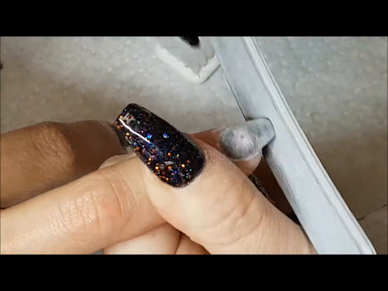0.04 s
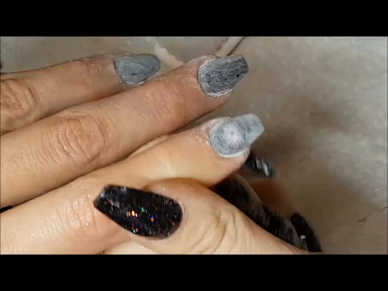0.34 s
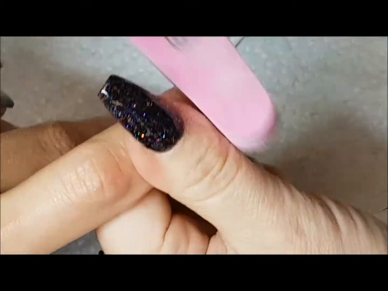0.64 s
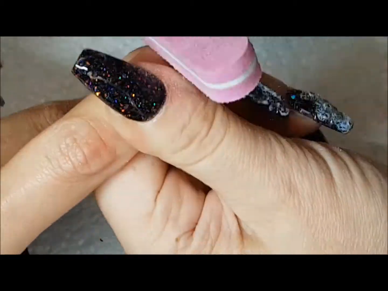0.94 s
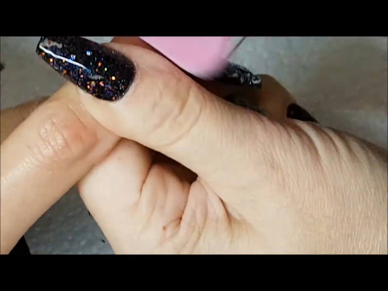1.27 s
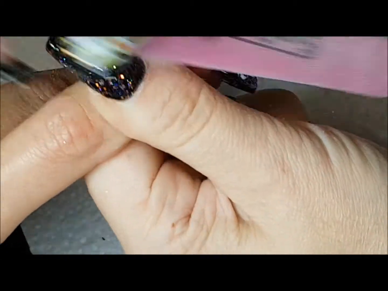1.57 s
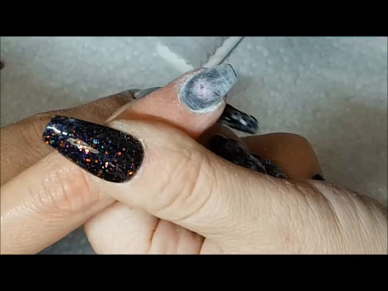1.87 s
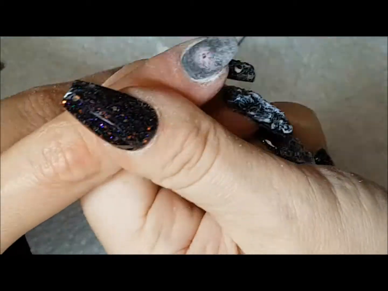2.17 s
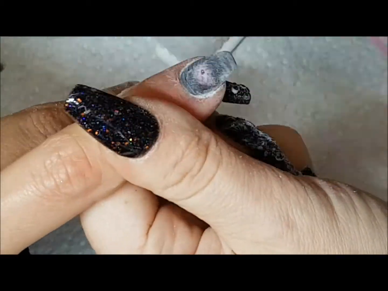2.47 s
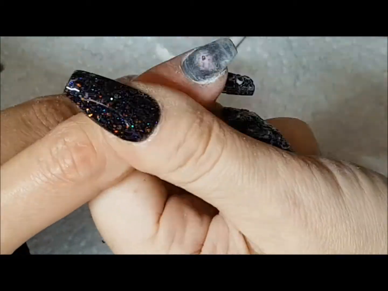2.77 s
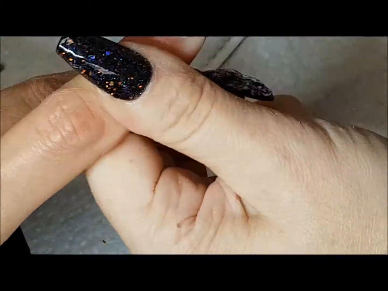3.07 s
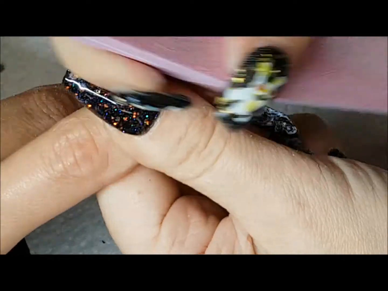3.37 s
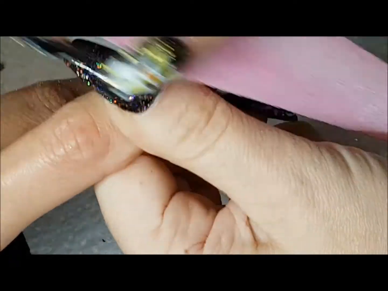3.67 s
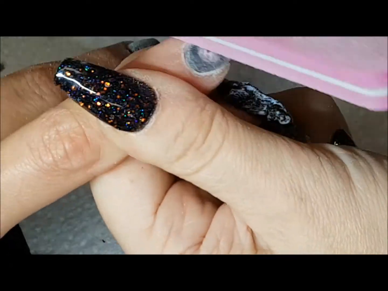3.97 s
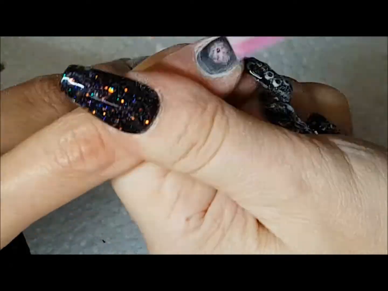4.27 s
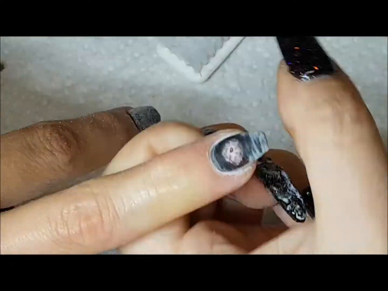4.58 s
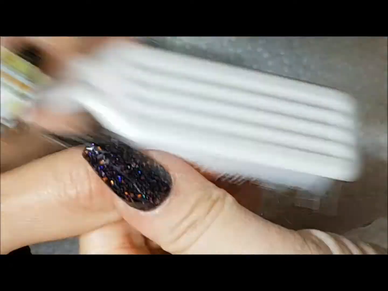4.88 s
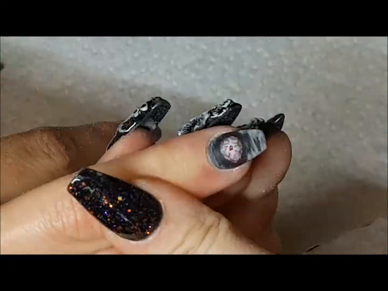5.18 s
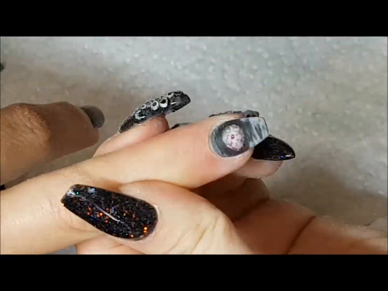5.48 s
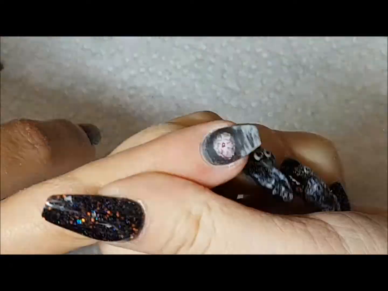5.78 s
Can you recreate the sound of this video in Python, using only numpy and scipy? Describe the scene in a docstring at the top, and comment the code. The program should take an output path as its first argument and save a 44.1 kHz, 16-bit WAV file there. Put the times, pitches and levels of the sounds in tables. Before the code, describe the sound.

In a small, faintly humming room, a foam block scrubs a gel nail with a fast, dry hiss, eases into separate light wipes, then skims it in another quick burst. Hard nails click together now and then. A tool knocks sharply on the table to the right, a brush briefly whisks off the dust, and a hand bumps and grazes the right side of the close microphone twice.

```python
"""A small, quietly humming room; a manicure a hand's length from a phone's two microphone ports.
A foam buffing block scrubs a gel nail in quick bursts and slower wipes, then a brush whisks the dust
off: both are friction, a hiss of tiny contacts that swells with each stroke. Hard nails click, a tool
is put down on the table to the right, and near the end a hand bumps and grazes the right port."""
import sys
import numpy as np
from scipy import signal
from scipy.fft import rfft, irfft, next_fast_len
from scipy.io import wavfile
from scipy.ndimage import uniform_filter1d, minimum_filter1d, map_coordinates

SR = 44100
rng = np.random.default_rng(int(sys.argv[2]) if len(sys.argv) > 2 else 0)


def wav_record(signal):
    """Record a signal, one row per channel, as 16-bit PCM in the file named by sys.argv[1]."""
    frames = np.transpose(np.atleast_2d(signal))
    bounded = np.clip(frames, -1, 1)
    # unit amplitude maps onto the largest positive 16-bit level
    quanta = np.round(bounded * 32767).astype(np.int16)
    wavfile.write(sys.argv[1], SR, quanta)


N = 261323

# hiss of the block pressed hard on the nail: f/Hz, density/dB
HARD_HISS = [(60, -23), (150, -15), (1500, -19), (2900, -11.5), (6000, -15.5), (8700, -8), (10900, -14),
             (12300, -4.5), (14200, -1.5), (15700, -8)]
# hiss of light rubbing: f/Hz, density/dB
LIGHT_HISS = [(100, -23), (2500, -4), (5900, -7.5), (9000, -1.5), (10500, -5.5), (12800, 2.5), (15700, -1)]
# likeness of close reflections at the two ports: f/Hz, correlation
ECHO_LIKENESS = [(1150, 0.99), (2300, 0.35), (6000, .05)]


def amp(db):
    """Decibels to gain."""
    return 10 ** (np.asarray(db) / 20)


def unit(x):
    """Scale to rms 1."""
    return x / np.sqrt(np.mean(x ** 2) + 1e-20)


def along(points, hz):
    """Read (f/Hz, value) points on a log axis."""
    f, v = np.transpose(points)
    return np.interp(np.log(hz + 1), np.log(f + 1), v)


def curve(rows):
    """Join (t/s, value) rows, one value per sample."""
    return np.interp(np.arange(N) / SR, *np.transpose(rows))


def wobble(rate):
    """A smooth random curve, rate knots a second."""
    return map_coordinates(rng.standard_normal(int(N * rate / SR) + 4), [np.arange(N) * rate / SR])


def filtered(x, response):
    """Filter x by a complex response of frequency."""
    n = x.shape[-1]
    size = next_fast_len(n + 8192)
    return irfft(rfft(x, size) * response(np.fft.rfftfreq(size, 1 / SR)), size)[..., :n]


def impulse(spectrum, size=4096):
    """The causal pulse that has this spectrum, with energy 1."""
    cepstrum = irfft(np.log(amp(along(spectrum, np.fft.rfftfreq(size, 1 / SR)))))
    cepstrum[1:size // 2] *= 2
    cepstrum[size // 2 + 1:] = 0
    pulse = irfft(np.exp(rfft(cepstrum)))
    return pulse / np.linalg.norm(pulse)


def add(track, s, sound):
    """Mix a sound into the track at time s."""
    part = track[:, round(s * SR):][:, :sound.shape[-1]]
    part += sound[..., :part.shape[-1]]


def spread(pair, spectrum, likeness=None):
    """Colour two unrelated signals; the spaced ports hear them alike in the bass, apart in the treble."""
    # likeness at the two ports: f/Hz, correlation
    usual_likeness = [(700, 0.98), (1400, 0.43), (3100, 0.1), (9000, 0.026)]

    def mid_side(hz):
        angle = np.arccos(np.clip(along(likeness or usual_likeness, hz), -1, 1)) / 2
        return amp(along(spectrum, hz)) * [np.cos(angle), np.sin(angle)]
    mid, side = filtered(pair, mid_side)
    return unit(np.array([mid + side, mid - side]))


def noise(n, spectrum, likeness=None):
    """n samples of coloured noise at the two ports."""
    return spread(rng.standard_normal((2, n)), spectrum, likeness)


def room(air_db=-66):
    """Room tone: a low hollow hum, which drops near the end, under a faint steady hiss."""
    # course of the hum: t/s, level/dB
    hum_level = [(0, -66), (.7, -61.5), (5.15, -63.5), (5.3, -70)]
    # colour of the hum: f/Hz, density/dB
    hum_colour = [(20, 2.5), (45, -26), (80, -17), (130, -12.5), (230, -4), (360, -25), (480, -0.5),
                  (580, -12), (730, 3.5), (930, -6.5), (1150, -9), (1450, -16), (5000, -35)]
    # colour of the hiss: f/Hz, density/dB
    air_colour = [(100, -19.5), (800, -19), (2050, 5), (2400, -4.5), (9000, -9.5), (15700, -11)]
    hum = amp(curve(hum_level) + 1.8 * wobble(7.554)) * noise(N, hum_colour)
    return hum + amp(air_db) * noise(N, air_colour)


def hand_on_port(bump_cycles=0.74, rough_db=3, slips_per_s=260, slip_db=6, left_db=-35):
    """Handling noise: skin bumps the right port and drags over it in a crunch of tiny slips."""
    # soft bumps of skin: t/s, level/dB, f/Hz
    bumps = [(5.154, -27, 300), (5.186, -22, 310), (5.192, -24, 500), (5.2185, -20, 500), (5.648, -26, 397),
             (5.664, -17, 380), (5.677, -20, 650), (5.6945, -11.5, 335), (5.699, -17, 800),
             (5.7084, -12, 550)]
    # skin sliding over the port: t/s, level/dB
    graze = [(5.13, -60), (5.172, -45), (5.19, -37), (5.226, -41), (5.24, -72), (5.605, -74), (5.645, -36),
             (5.705, -24.5), (5.728, -32), (5.76, -73)]
    # dull colour of the drag: f/Hz, density/dB
    skin_colour = [(40, -34), (90, -18), (160, 0.5), (300, 2), (560, 4), (1000, -3), (1800, -12.5),
                   (3000, -25), (9000, -53)]
    out, t = np.zeros((1, N)), np.arange(SR // 20) / SR - 1 / 40
    for s, db, hz in bumps:
        bump = np.exp(-(t * hz / bump_cycles) ** 2) * np.cos(2 * np.pi * (hz * t + rng.random()))
        add(out, s + t[0], amp(db) * bump)
    slip_rate = slips_per_s * np.exp(.5 * wobble(slips_per_s))
    slips = np.diff(np.floor(np.cumsum(slip_rate) / SR), prepend=0)
    slips *= rng.choice([-1, 1], N) * amp(rough_db * rng.standard_normal(N))
    crunch = amp(slip_db) * unit(slips) + rng.standard_normal(N)
    drag = unit(signal.fftconvolve(crunch, impulse(skin_colour))[:N])
    return amp([[left_db], [0]]) * (out + amp(curve(graze)) * drag)


def knocks(rows, spectrum, ring_db, near_db, near_t60, far_db, far_t60, low_cut_hz, treble_db,
           left_lag_ms=0, left_shade_db=0, thin_hz_per_db=0):
    """Each knock is a sharp crack, a short plastic ring and a scatter off the hands and the table."""
    # modes of the hard plastic: f/Hz, level/dB, t60/s
    modes = [(529, -9.5, 0.061), (690, -4.5, 0.029), (960, 1, 0.026), (1106, 5.5, 0.017),
             (1420, -9.5, 0.036), (1950, -10, 0.055), (2500, -14, 0.055)]
    out, crack = np.zeros((2, N)), impulse(spectrum)
    t = np.arange(len(crack)) / SR
    loudest_db = max(db for _, db, _ in rows)

    def to_ports(hz):
        shelf = along([(1100, 0.032), (1900, 0.98)], hz)
        treble = amp(shelf * np.array([[treble_db - left_shade_db], [treble_db]]))
        return treble * np.exp(1j * np.pi * hz * left_lag_ms / 1000 * np.array([[-1], [1]]))
    for s, db, bright_hz in rows:
        ring = sum(amp(level + rng.normal(0, 1.9) - 60 * t / t60)
                   * np.cos(2 * np.pi * hz * rng.normal(1, 0.013) * t) for hz, level, t60 in modes)
        echo_decay = amp(near_db - 60 * t / near_t60) + amp(far_db - 60 * t / far_t60)
        knock = crack + amp(ring_db) * ring + echo_decay * noise(len(t), spectrum, ECHO_LIKENESS)
        knock = np.pad(knock, ((0, 0), (32, 0)))  # room for the earlier port's arrival
        # soft contacts lose their treble, and the lighter the touch, the less bass it radiates
        thin_hz = low_cut_hz + thin_hz_per_db * (loudest_db - db)
        knock = signal.sosfilt(signal.butter(2, min(bright_hz, SR / 3), fs=SR, output="sos"), knock)
        knock = signal.sosfilt(signal.butter(2, thin_hz, "high", fs=SR, output="sos"), knock)
        knock = filtered(knock, to_ports)
        add(out, s - 32 / SR, amp(db) * 8 * knock / np.linalg.norm(knock))
    return out


def tool_put_down():
    """A tool knocks on the table off to the right; the left port hears it later and duller."""
    # the landing: t/s, relative level/dB, low-pass f/Hz
    landing = [(4.8025, -1, 8980)]
    # crack of tool on table: f/Hz, density/dB
    crack = [(250, -28), (400, -17.5), (510, -2.5), (620, -9), (880, -3), (1100, 3.5), (1290, -8.5),
             (1460, 2), (1950, -2.5), (4500, -5), (7400, -9.5), (9500, -26.5), (15700, -23)]
    return knocks(landing, crack, ring_db=-28.5, near_db=-18.5, near_t60=0.037, far_db=-22,
                  far_t60=0.067, low_cut_hz=404, treble_db=2.5, left_lag_ms=0.091, left_shade_db=1.5)


def nail_clicks():
    """Hard nails knock on each other and on the block."""
    # contacts: t/s, relative level/dB, low-pass f/Hz
    clicks = [(0.4066, -28.5, 3300), (0.4492, -15.5, 2900), (2.51, -34, 1300), (2.5206, -14, 1550),
              (2.528, -16.5, 1600), (4.557, -30.5, 1300), (4.573, -18, 3380), (4.5746, -20, 8100),
              (4.5982, -27, 1900), (4.6315, -32.5, 2000), (4.641, -35.5, 5500), (4.652, -34, 2000),
              (4.683, -42.5, 2200), (5.3055, -34.5, 4760)]
    # crack of a nail: f/Hz, density/dB
    crack = [(250, -11.5), (520, -1.5), (1080, 1.5), (1310, -6.5), (1500, -3), (4500, -4), (7400, -9.5),
             (9500, -7), (15700, -28)]
    return knocks(clicks, crack, ring_db=-26, near_db=-22, near_t60=0.0337, far_db=-28,
                  far_t60=0.079, low_cut_hz=378, treble_db=-3, thin_hz_per_db=14)


def light_ticks(scatter_db=-21, t60=0.024):
    """Each slight contact is one crisp pulse and a very short scatter."""
    # light ticks, and two faint short scrapes at the start: t/s, level/dB
    ticks = [(.041, -41), (.102, -40), (2.123, -30.5), (2.5953, -28.5), (2.649, -30.5), (2.696, -34),
             (3.174, -28.5), (3.217, -33.5), (3.247, -34), (3.29, -31), (4.495, -28.5)]
    # colour of a tick: f/Hz, density/dB
    tick_colour = [(200, -9), (1200, -2), (2300, 5), (4000, -4), (7000, -12), (15700, -11)]
    out, pulse = np.zeros((2, N)), impulse(tick_colour)
    t = np.arange(len(pulse)) / SR
    for s, db in ticks:
        scatter = amp(scatter_db - 60 * t / t60) * noise(len(t), tick_colour, ECHO_LIKENESS)
        add(out, s, amp(db) * (pulse + scatter))
    return out


def grit_snaps(t60=0.021):
    """Single grits catch on the nail's edge and let go with a thin tick."""
    # grits letting go: t/s, level/dB
    snaps = [(.4492, -45), (2.5206, -43), (4.33, -44), (4.568, -38.5), (4.648, -40), (5.5082, -43)]
    out, t = np.zeros((2, N)), np.arange(SR // 20) / SR
    for s, db in snaps:
        tick = noise(len(t), [(500, -30), (4000, -6), (9000, 11), (15000, 10)])
        add(out, s, amp(db - 60 * t / t60) * tick)
    return out


def friction(spectrum, grain_db, patchy_db=1.7, grits_per_s=30, grit_db=11):
    """Tiny contacts merge into a hiss whose colour shifts with the grip; coarse grits tick in it."""
    grits = (rng.random(N) < grits_per_s / SR) * amp(grit_db + rng.standard_normal(N))
    contacts = rng.standard_normal((2, N)) * amp(grain_db * wobble(1800))
    bands = signal.stft(contacts + grits, nperseg=256)[2]
    patches = uniform_filter1d(rng.standard_normal(bands.shape[1:]), size=7, axis=0)  # over frequency
    patches = uniform_filter1d(patches, size=18, axis=1)  # over time
    hiss = signal.istft(bands * amp(patchy_db * unit(patches)), nperseg=256)[1]
    return spread(hiss[:, :N], spectrum)


def sizzle(hiss, extra_db, edge_hz=12000):
    """The nail's edge digging into the block brings out the top of the hiss."""
    top = filtered(hiss, lambda hz: 1 / (1 + np.exp((edge_hz - hz) / 400)))
    return hiss + (amp(extra_db) - 1) * top


def scrub(tempo, pressure, spectrum, grain_db, turn_floor, sharpness, lean, uneven_db, fast_sizzle_db):
    """The tool breaks free after each turn and slows toward the next; level and sizzle follow speed."""
    done = curve(tempo)
    stroke = done.astype(int)
    moving = (done > 0) & (done < tempo[-1][1])
    speed = np.abs(np.sin(np.pi * (done - stroke) ** lean))
    swing = moving * (turn_floor + speed ** sharpness)
    s, level_db, sizzle_db = np.transpose(pressure)
    stroke_db = uneven_db * rng.standard_normal(stroke[-1] + 1)[stroke]
    force_db = curve(np.c_[s, level_db]) + stroke_db + wobble(300)
    loudness = amp(force_db) * swing / np.sqrt(np.mean(swing[moving] ** 2))
    top_db = curve(np.c_[s, sizzle_db]) + fast_sizzle_db * (speed - 1)
    return loudness * sizzle(friction(spectrum, grain_db), top_db)


def dust_brush():
    """Bristles whisk to and fro over the nail."""
    # the hand's pace: t/s, strokes done
    tempo = [(4.873, 0), (5.2, 16)]
    # how firmly the brush bears: t/s, level/dB, sizzle/dB
    pressure = [(4.87, -56, 0), (4.98, -49.5, 0), (5.15, -55.5, 0), (5.19, -48, 0)]
    # hiss of the bristles: f/Hz, density/dB
    bristle_hiss = [(70, -15), (250, -1), (1900, -3), (4200, -6), (8500, 1.5), (11200, -4.5), (15700, -3.5)]
    return scrub(tempo, pressure, bristle_hiss, grain_db=1, turn_floor=0.32, sharpness=1.4,
                 lean=0.9, uneven_db=0.5, fast_sizzle_db=0.3)


def swishes(sharpness=.9, uneven_db=1.5, fast_sizzle_db=3, overhang_s=.007, ring_db=4.5,
            ring_width_hz=900):
    """Foam or skin lands, slides with wavering pressure and eases off, sizzling most in mid-stroke."""
    # wipes of the block, and skin brushing near the end: t/s, length/s, level/dB, sizzle/dB
    strokes = [(0, 0.11, -56.5, -12), (0.47, 0.28, -64, -2), (1.843, 0.21, -61.5, -2),
               (1.995, 0.054, -51.5, 0), (2.089, 0.043, -49.5, -1.5), (2.169, 0.057, -52.5, 0),
               (2.245, .055, -59, 1), (2.311, 0.058, -52.5, 1), (2.388, 0.05, -56.5, 0),
               (2.457, 0.052, -54, -2), (2.592, 0.068, -53, 1), (2.699, 0.056, -54.5, -1),
               (2.773, 0.094, -61, -2), (2.856, 0.085, -53.5, 2), (2.958, 0.053, -54, 0),
               (3.055, 0.057, -49.5, 0.5), (3.13, .054, -52.5, -3), (3.218, 0.038, -53, -4),
               (3.284, 0.091, -54, 2), (3.388, 0.06, -55.5, 0), (3.456, 0.051, -57.5, 2),
               (3.529, 0.039, -56, -1), (4.096, 0.048, -59.5, -5), (4.15, 0.11, -60, -6),
               (4.276, 0.065, -53, 4), (4.368, 0.064, -57, 4), (4.467, 0.04, -53.5, -4),
               (5.565, 0.051, -60.5, -8), (5.651, 0.028, -48, -7), (5.706, 0.038, -50, -11),
               (5.866, 0.064, -57, -7)]
    # ring in the hiss, moving with the grip: t/s, f/Hz
    grip_ring = [(2.1, 8400), (2.35, 9800), (4.3, 10200)]
    t, out = np.arange(N) / SR, np.zeros((2, N))
    hiss = amp(uneven_db * wobble(110)) * friction(LIGHT_HISS, grain_db=2.5)
    for start, length, db, sizzle_db in strokes:
        # a soft surface touches early and lets go late
        progress = (t - start + overhang_s) / (length + 2 * overhang_s)
        inside = (progress > 0) & (progress < 1)
        speed = np.sin(np.pi * progress[inside])
        ring_hz = np.interp(start, *np.transpose(grip_ring))
        ring = lambda hz: amp(ring_db * np.exp(-((hz - ring_hz) / ring_width_hz) ** 2))
        top_db = sizzle_db + fast_sizzle_db * (speed - speed.mean())
        stroke = sizzle(filtered(hiss[:, inside], ring), top_db)
        out[:, inside] += amp(db) * unit(speed ** sharpness) * stroke
    return out


def light_buffing():
    """The block skims the nail in one quick burst, hissing on through the turns."""
    # the hand's pace: t/s, strokes done
    tempo = [(3.597, 0), (3.632, 1), (3.711, 4), (3.891, 12), (4.105, 23)]
    # how firmly the block bears: t/s, level/dB, sizzle/dB
    pressure = [(3.6, -57, 3), (3.74, -49.5, -1.5), (3.88, -52.5, 0), (3.98, -55, 4.5), (4.1, -54.5, 2)]
    return scrub(tempo, pressure, LIGHT_HISS, grain_db=-0.3, turn_floor=0.6, sharpness=1.1,
                 lean=0.59, uneven_db=1, fast_sizzle_db=5)


def block_catches(rise_s=.003):
    """Now and then a hard stroke bites: a brief scrape that can shake the whole finger."""
    # strokes that bite: t/s, level/dB, finger's body re the scrape/dB
    catches = [(.738, -43.5, -26), (.954, -42.5, -24), (.998, -40.5, -30), (1.637, -44, -11),
               (1.681, -45.5, 3), (1.729, -51, 10), (1.793, -44.5, -18)]
    # body of the finger: f/Hz, density/dB
    finger_colour = [(100, -5), (310, 14.5), (900, 1.5), (3000, -3.5), (8000, 2), (13000, -11)]
    out, t = np.zeros((2, N)), np.arange(SR // 20) / SR
    bite = t / rise_s * np.exp(1 - t / rise_s)
    for s, db, body_db in catches:
        scrape, body = noise(len(t), HARD_HISS), noise(len(t), finger_colour)
        add(out, s, amp(db) * bite * (scrape + amp(body_db) * body))
    return out


def hard_buffing():
    """The block bears down and scrubs fast, its hiss dipping at every turn."""
    # the hand's pace: t/s, strokes done
    tempo = [(.665, 0), (.804, 6), (.95, 13), (1.076, 19), (1.237, 27), (1.726, 48), (1.859, 54)]
    # how firmly the block bears: t/s, level/dB, sizzle/dB
    pressure = [(.66, -48, 1), (.76, -46.5, 1.5), (.99, -44.5, 3), (1.06, -47.5, 3.5), (1.11, -51.5, -1),
                (1.19, -45, -1), (1.26, -46, -4), (1.47, -46, 2), (1.68, -47, -1), (1.76, -51, 1.5),
                (1.85, -47, 2)]
    return scrub(tempo, pressure, HARD_HISS, grain_db=1.6, turn_floor=0.27, sharpness=0.87,
                 lean=0.78, uneven_db=1.2, fast_sizzle_db=7)


def scene():
    """The work is a hand's length away, slightly right; the grazing hand is on the port itself."""
    # balance of the ports, left then right: gain/dB
    balance = [
        [-.3],
        [.3],
    ]
    scrubbing = hard_buffing() + light_buffing() + dust_brush()
    knocking = nail_clicks() + tool_put_down()
    touches = block_catches() + swishes() + light_ticks() + grit_snaps()
    return (scrubbing + knocking + touches + room()) * amp(balance) + hand_on_port()


def record(dry, ceiling=.88, top_hz=15850):
    """The phone's limiter holds peaks under full scale; nothing is kept above its band limit."""
    needed = np.minimum(1, ceiling / (np.abs(dry).max(axis=0) + 1e-9))
    gain = uniform_filter1d(minimum_filter1d(needed, size=65), size=65)
    return filtered(dry * gain, lambda hz: 1 / (1 + (hz / top_hz) ** 500))


dry = scene()
out = record(dry)
wav_record(out)
```